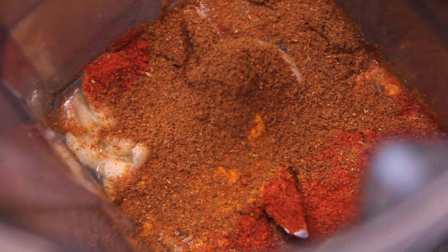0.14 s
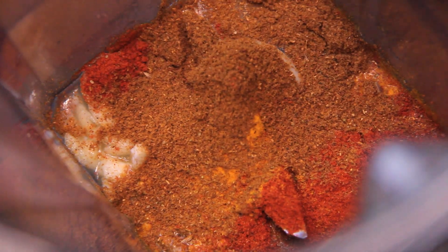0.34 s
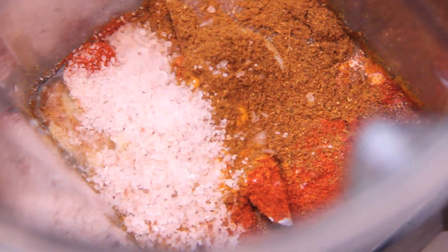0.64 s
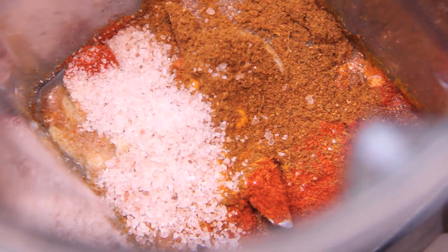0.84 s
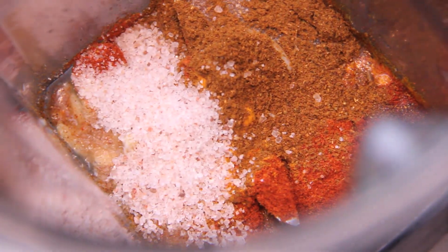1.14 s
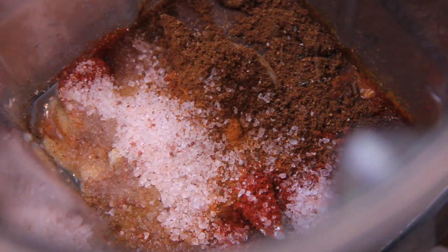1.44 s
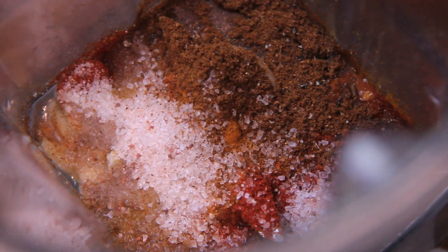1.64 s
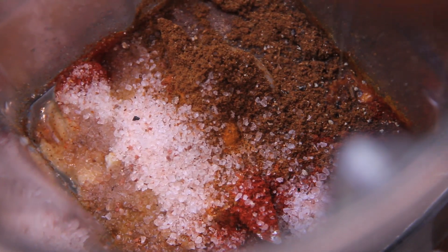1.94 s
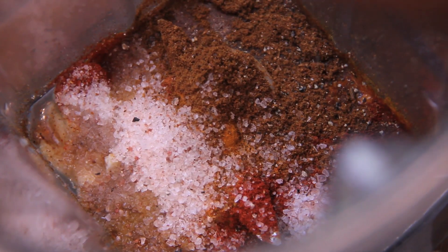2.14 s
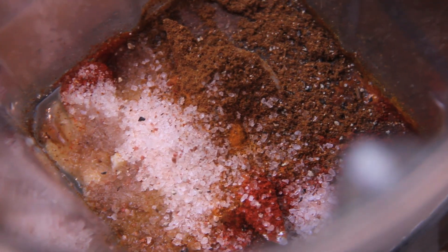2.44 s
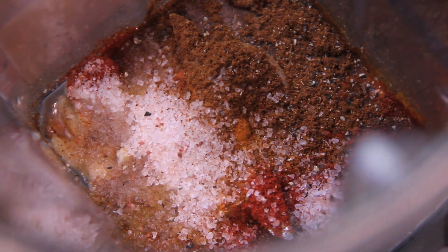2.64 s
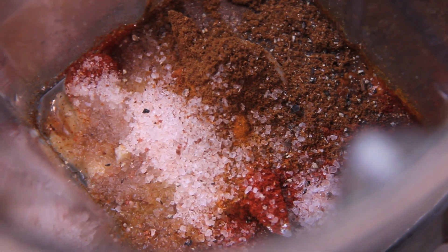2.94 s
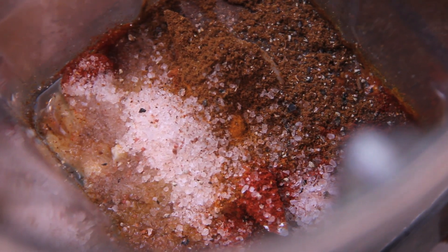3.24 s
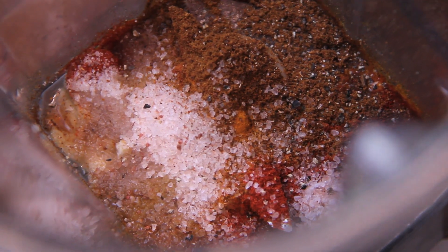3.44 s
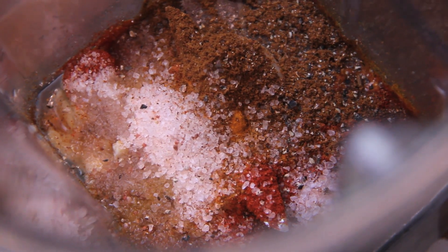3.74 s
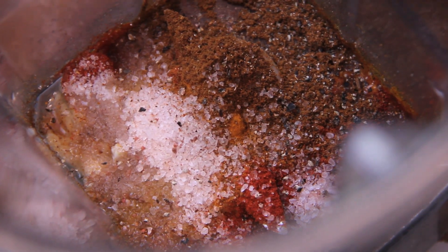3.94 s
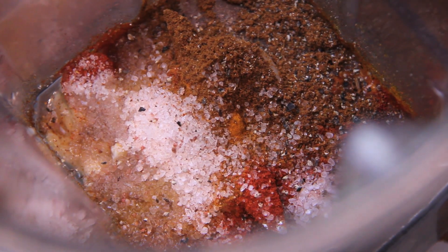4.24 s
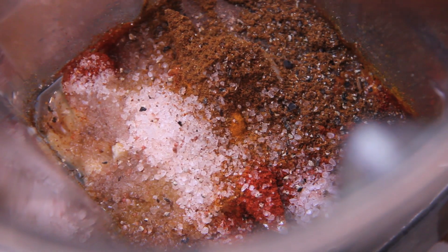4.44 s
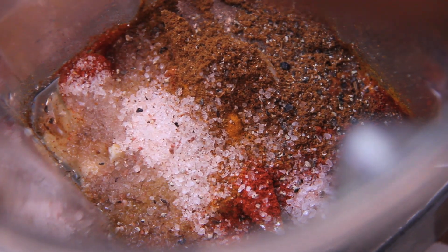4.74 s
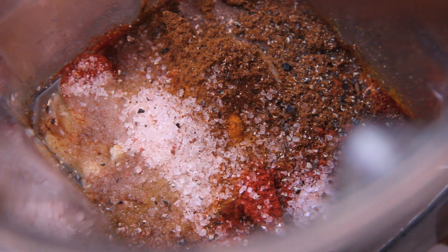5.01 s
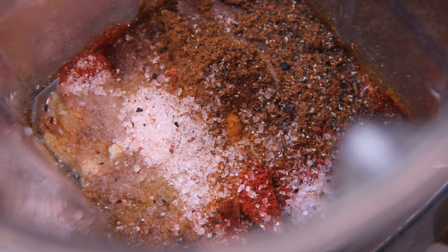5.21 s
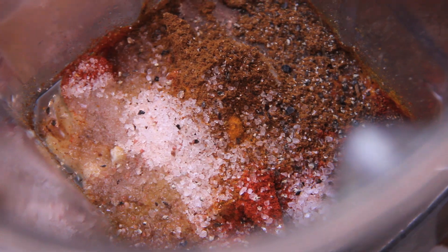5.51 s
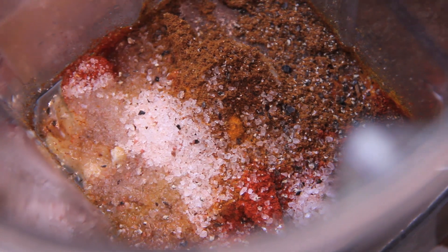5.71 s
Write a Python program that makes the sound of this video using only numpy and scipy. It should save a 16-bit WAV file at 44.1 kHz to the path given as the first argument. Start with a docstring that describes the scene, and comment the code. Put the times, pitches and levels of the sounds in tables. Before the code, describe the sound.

At the very start a spoon knocks lightly on the rim of a plastic blender jar, about three quick hollow clacks that stop short at 0.4 seconds. Around 0.55 seconds salt lands on powder with a faint, brief patter. A short scrape follows near 1 second. From 1.4 seconds until the end, around 6 seconds, a pepper mill twists back and forth at about three and a half strokes a second. Each stroke is a dry crunch ending in fine, bright grit. Peppercorns burst with sharp, irregular cracks, the loudest sounds here, and the shaft gives soft dull bumps on some reversals. A very faint thin squeak comes just after 3 seconds. Near 5.8 seconds a last loud crack carries a short low thump as it overloads the microphone. Everything is close, with slight kitchen reverberation and a very low background hush.

```python
"""Seasoning a blender jar

Close over a plastic jar in a kitchen: a spoon knocks spice off on the rim, salt slides in and
something scrapes briefly. Then a pepper mill twists back and forth, about 3.5 strokes a second:
peppercorns crack between the burrs, the pieces are crushed, each stroke ends in fine bright grit."""
import sys
import numpy as np
from scipy import signal
from scipy.fft import rfft, irfft, next_fast_len
from scipy.io import wavfile
from scipy.ndimage import uniform_filter1d, map_coordinates

SR = 44100
rng = np.random.default_rng(int(sys.argv[2]) if len(sys.argv) > 2 else 0)


def master_out(mix):
    """Clip the mix to full scale and print it as 16-bit PCM to the path in sys.argv[1]."""
    frames = np.transpose(np.atleast_2d(mix))
    ceiling = np.clip(frames, -1, 1)
    pcm = np.round(ceiling * 32767).astype(np.int16)
    wavfile.write(sys.argv[1], SR, pcm)


N = 258867


def amp(db):
    """Decibels to gain."""
    return 10 ** (np.asarray(db) / 20)


def unit(x):
    """x at rms 1."""
    return x / np.sqrt(np.mean(x ** 2) + 1e-20)


def along(points, hz):
    """(Hz, value) points read on a log axis."""
    freqs, values = np.transpose(points)
    return np.interp(np.log(hz + 1), np.log(freqs + 1), values)


def envelope(points):
    """Gain per sample from (s, dB) points; silent outside them."""
    times, db = np.transpose(points)
    return amp(np.interp(np.arange(N) / SR, times, db, left=-120, right=-120))


def add(track, at_s, sound):
    """Mix a sound into the track."""
    start = round(at_s * SR)
    part = sound[max(-start, 0):max(N - start, 0)]
    track[max(start, 0):][:len(part)] += part


def colour(x, spectrum, size=4096):
    """Minimum-phase filter of energy 1, shaped by (Hz, dB) points."""
    gain = amp(along(spectrum, np.fft.rfftfreq(size, 1 / SR)))
    cepstrum = irfft(np.log(gain))
    cepstrum[1:size // 2] *= 2
    cepstrum[size // 2 + 1:] = 0
    response = irfft(np.exp(rfft(cepstrum)))
    return signal.fftconvolve(x, response / np.linalg.norm(response))[:len(x)]


def burst(t60_s, size=8192):
    """Decaying noise puff of energy 1."""
    puff = rng.standard_normal(size) * amp(-60 * np.arange(size) / SR / t60_s)
    return puff / np.linalg.norm(puff)


def grains(per_s, spread_db, t60_s, bed):
    """Tiny puffs of random time and size on a steady noise bed; rms 1."""
    sizes = amp(spread_db * np.clip(rng.standard_normal(N), -2, 2))
    snaps = (rng.random(N) < per_s / SR) * sizes ** 2
    power = signal.lfilter([1], [1, -amp(-120 / (t60_s * SR))], snaps)
    return unit(rng.standard_normal(N) * np.sqrt(power / power.mean() + bed))


# background spectrum (frequency [Hz], level [dB])
HUSH_SPECTRUM = [(15, -28), (25, -17), (70, -1.5), (157, -4.5), (270, 0), (624, -13), (1190, -14),
                 (1290, -18.5), (6740, -25), (16000, -35)]


def room_hush():
    """The kitchen's steady low background."""
    return amp(-61.5) * unit(colour(rng.standard_normal(N), HUSH_SPECTRUM))


# room decay (frequency [Hz], t60 [s])
KITCHEN_DECAY = [(200, 0.39), (1000, 0.42), (4000, 0.34), (9000, 0.2), (15000, 0.3)]


def kitchen(x, wet_db):
    """Room reverberation; a fresh tail every 1/8 s stands for the moving hands."""
    out, block = np.zeros(N), SR // 8
    for start in range(0, N, block):
        hz, t, noise = signal.stft(rng.standard_normal(SR // 2), SR, nperseg=256)
        decay = amp(-60 * t / along(KITCHEN_DECAY, hz)[:, None])
        onset = 1 - np.exp(-t / 0.00035)
        _, tail = signal.istft(noise * decay * onset, SR, nperseg=256)
        add(out, start / SR, signal.fftconvolve(x[start:start + block], tail / np.linalg.norm(tail)))
    return amp(wet_db) * out


# spoon on the rim (time [s], level [dB])
RIM_KNOCKS = [(-.055, -14), (0.108, -21.5), (0.2656, -17.5)]
# jar modes (frequency [Hz], level [dB], t60 [s])
JAR_MODES = [(175, -21.5, 0.12), (388, -14, 0.076), (435.6, -4, 0.15), (533, 1.5, 0.12), (657, -3, 0.037),
             (714, -11, 0.14), (1023, -13.5, 0.08), (1493, -2.5, 0.068), (1767, -3.5, 0.048),
             (2160, -1, 0.028), (2440, -7, 0.051), (2780, -6, 0.03)]
# contact spectrum (frequency [Hz], level [dB])
CLACK_SPECTRUM = [(150, -37.5), (450, -4), (1100, -7.5), (2400, -6.5), (3200, -10), (3900, -25),
                  (4400, -10.5), (5900, -16), (8000, -31), (9500, -26), (11000, -36), (16000, -47)]


def spoon_knocks(cutoff_s=0.405):
    """Each knock clacks and rings the jar; the sound stops short after the last."""
    out, t = np.zeros(N), np.arange(SR // 2) / SR
    for at_s, db in RIM_KNOCKS:
        ring = np.zeros(len(t))
        for hz, mode_db, t60_s in JAR_MODES:
            decay = amp(mode_db + rng.normal(0, 1) - 60 * t / t60_s)
            ring += decay * np.sin(2 * np.pi * hz * t + rng.uniform(0, 2 * np.pi))
        ring *= 1 - np.exp(-t / 0.0031)
        contact = burst(t60_s=0.04, size=len(t)) + 0.087 * burst(t60_s=0.47, size=len(t))
        clack = amp(22) * colour(contact, CLACK_SPECTRUM) * (1 - np.exp(-t / 0.00069))
        add(out, at_s, amp(db) * (ring + clack))
    return (out + kitchen(out, wet_db=-12)) * (np.arange(N) / SR < cutoff_s)


# salt landing (time [s], level [dB])
SALT_FLOW = [(.52, -82), (.545, -54), (.57, -55.5), (.62, -62.5), (.72, -79), (.8, -81)]
# patter spectrum (frequency [Hz], level [dB])
SALT_SPECTRUM = [(300, -28), (900, -6), (1600, -1.5), (3500, -5.5), (7500, -4.5), (11000, -9), (16000, -8)]


def salt():
    """Crystals patter softly on the powder."""
    patter = grains(per_s=2500, spread_db=3.5, t60_s=0.0025, bed=0.2)
    return envelope(SALT_FLOW) * colour(patter, SALT_SPECTRUM)


# scrape contour and its catches (time [s], level [dB])
SCRAPE_CONTOUR = [(.87, -75), (.915, -61), (.937, -54), (.943, -40.5), (.975, -40), (1.01, -49),
                  (1.05, -59), (1.09, -59), (1.14, -80)]
SCRAPE_CATCHES = [(0.921, -21.5), (0.94, -24), (0.95, -27), (0.958, -26), (1.06, -30)]
# scrape resonances; body tone, shared with the cracks (frequency [Hz], level [dB])
SCRAPE_SPECTRUM = [(250, -21), (600, -7.5), (1200, 2.5), (2400, -7.5), (3400, -15), (4100, -14),
                   (5900, -18), (6400, -4.5), (8000, -14.5), (9400, -24), (10300, -9.5), (11500, -26),
                   (16000, -31)]
BODY_SPECTRUM = [(40, -33), (250, -20.5), (450, -11), (700, 1.5), (990, 4.5), (1180, 1), (1400, 7.5),
                 (1600, 1), (2150, 2), (3000, -3.5), (6000, -22.5)]


def scrape():
    """Quick uneven slips excite a few broad resonances; their lower part lingers in the room."""
    slips = envelope(SCRAPE_CONTOUR) * grains(per_s=290, spread_db=2.5, t60_s=0.0034, bed=0.86)
    for at_s, db in SCRAPE_CATCHES:
        catch = burst(t60_s=0.0015) + 0.55 * burst(t60_s=0.065)
        add(slips, at_s + 0.00113, amp(db + 6.5) * catch)
    return amp(1) * colour(slips, SCRAPE_SPECTRUM) + kitchen(colour(slips, BODY_SPECTRUM), wet_db=-10)


# mill strokes (bite time [s], lead-in [s], length [s], bite grit [dB], squeeze grit [dB], crush [dB])
MILL_STROKES = [(1.403, .02, 0.16, -30, -28, -37), (1.754, 0.11, 0.1, -31.5, -28, -32.5),
                (1.99, 0.025, 0.17, -31, -27.5, -35), (2.312, 0.068, 0.17, -32.5, -28.5, -37),
                (2.623, .06, 0.15, -33, -26.5, -37), (2.881, .02, .17, -30, -29, -37),
                (3.173, .06, 0.16, -31.5, -28.5, -34.5), (3.442, 0.044, 0.18, -30.5, -28, -39.5),
                (3.752, 0.12, .14, -31, -31.5, -40), (4.008, 0.0099, 0.18, -25, -31, -46),
                (4.324, 0.083, 0.15, -31, -31.5, -37.5), (4.57, 0.019, 0.21, -29, -28.5, -35.5),
                (4.896, 0.062, .15, -29.5, -30.5, -40), (5.161, 0.056, 0.15, -27.5, -25.5, -38.5),
                (5.449, 0.13, 0.14, -28, -27, -36), (5.737, 0.18, 0.22, -31.5, -34, -49)]


def stroke_gains(onset_s=1.407):
    """Coarse and fine gains: a stroke bites, eases as the corns give way, squeezes and lets go."""
    squeeze_s, release_s, fade_s = 0.021, 0.037, 0.044
    slack_db, rest_db = -47, -66
    coarse, fine = np.zeros((2, N))
    for bite_s, lead_s, length_s, bite_db, squeeze_db, crush_db in MILL_STROKES:
        start_s, end_s = bite_s - lead_s, bite_s + length_s
        eased_db = (bite_db + squeeze_db) / 2 - 5
        grit = envelope([
            (start_s - fade_s, rest_db), (start_s, slack_db), (bite_s, bite_db),
            (bite_s + 0.51 * length_s, eased_db), (end_s - squeeze_s, squeeze_db), (end_s, squeeze_db),
            (end_s + release_s, slack_db), (end_s + release_s + fade_s, rest_db)])
        pieces = envelope([
            (start_s, rest_db), (bite_s, bite_db - 14), (bite_s + 0.36 * length_s, crush_db),
            (end_s, crush_db - 17.5), (end_s + release_s, rest_db)])
        coarse, fine = np.maximum(coarse, pieces), np.maximum(fine, grit)
    loose_crumbs = amp([[-54], [-49.5]])
    return np.hypot([coarse, fine], loose_crumbs) * (np.arange(N) / SR > onset_s)


def chips(per_stroke=3, body_db=-24, bright_db=-14):
    """Small pieces snap at random in every stroke; rows for cracks()."""
    rows = []
    for bite_s, lead_s, length_s, *_ in MILL_STROKES:
        for place, strength in rng.random((per_stroke, 2)):
            at_s = bite_s - lead_s / 2 + place * (length_s + lead_s / 2)
            rows.append((at_s, -26 + 6 * strength, body_db, bright_db))
    return rows


def clumps(depth_db=1, knots_per_s=41):
    """Uneven gain: grains cluster as single corns collapse."""
    wander = map_coordinates(rng.standard_normal(4096), [np.arange(N) * knots_per_s / SR])
    return unit(amp(depth_db * wander))


# spectra of coarse pieces, grit and dust (frequency [Hz], level [dB])
CRUSH_SPECTRUM = [(150, -61), (400, -19), (680, -2), (980, -1), (1200, 0), (1500, 0.5), (2200, 5.5),
                  (3000, 2.5), (4500, -1), (5500, 0), (8000, -1.5), (16000, -49.5)]
GRIT_SPECTRUM = [(300, -47), (1500, -20), (2300, -11.5), (2900, -5.5), (3700, -5.5), (4600, -6),
                 (5500, -3.5), (7000, -2.5), (9200, -1), (10500, -7), (13000, -17.5), (16000, -29)]
DUST_SPECTRUM = [(3000, -29), (6500, 7), (9000, -12.5), (10500, -2.5), (12000, -4.5), (14000, -12.5),
                 (16000, -14.5)]


def grinding():
    """The burrs crush coarse pieces in mid-stroke and mill them to grit; some fractures sound in both."""
    coarse, fine = stroke_gains() * clumps()
    shared = grains(per_s=180, spread_db=2, t60_s=0.051, bed=0.022)
    crush = unit(grains(per_s=600, spread_db=2, t60_s=0.012, bed=0.093) + 0.57 * shared)
    grit = unit(grains(per_s=900, spread_db=3.5, t60_s=0.0015, bed=0.4) + 0.87 * shared)
    pressure = fine / (fine + amp(-34))  # only a firm twist makes the brightest dust
    dust = amp(-13.5) * pressure * colour(grit, DUST_SPECTRUM)
    crushing = amp(1.5) * coarse * colour(crush, CRUSH_SPECTRUM)
    return crushing + fine * (amp(-0.5) * colour(grit, GRIT_SPECTRUM) + dust)


# barrel modes (frequency [Hz], bandwidth [Hz], level [dB])
BARREL_MODES = [(987, 26, -3), (1407, 29, -13), (2130, 14, -4.5), (2720, 370, -18), (3610, 43, -4.5),
                (4450, 370, -6.5), (6110, 98, -9.5), (6690, 62, -10)]


def barrel(x, size=4096):
    """The mill's barrel rings on briefly after each fracture."""
    t, response = np.arange(size) / SR, np.zeros(size)
    for hz, width_hz, db in BARREL_MODES:
        decay = 2 * np.pi * width_hz / SR * np.exp(-np.pi * width_hz * t)
        response += amp(db) * decay * np.cos(2 * np.pi * hz * t)
    response[0] += 1  # direct path
    return signal.fftconvolve(x, response / np.linalg.norm(response))[:N]


# shaft bumps (time [s], level [dB])
SHAFT_BUMPS = [(1.406, -42), (1.677, -37), (2.854, -33), (3.411, -38), (3.987, -34.5), (4.28, -39),
               (4.557, -36.5), (4.847, -30.5), (5.11, -38.5)]


def shaft_bumps():
    """Play in the shaft gives a dull bump when the twist reverses."""
    spectrum = [(40, -36), (90, -10), (170, -6.5), (300, -11), (600, -17.5), (1500, -17), (5000, -45)]
    out = np.zeros(N)
    for at_s, db in SHAFT_BUMPS:
        add(out, at_s + 0.0034, amp(db + 14) * burst(t60_s=0.1))
    return colour(out, spectrum)


# bursting peppercorns (time [s], level [dB], relative body [dB], relative brightness [dB])
CORN_CRACKS = [(1.48, -4.5, -22.5, -14.5), (1.4854, -11, -11, -11.5), (1.5276, -12, -17.5, -12),
               (1.5327, -13, -19, -16), (1.7818, -16, -14, -9), (2.145, -28, -39, -5),
               (2.394, -19.5, -21.5, -5.5), (2.555, -24.5, -22, -4), (2.6247, -4.5, -12, -13),
               (2.7801, -16, -43, -5.5), (2.9049, -19.5, -6, -8), (2.9288, -15, -15.5, -8),
               (3.032, -17.5, -42, -8), (3.2295, -9, -16, -9), (3.2432, -3.5, -20, -13.5),
               (3.3382, -22, -23, -3), (3.486, -1.5, -20.5, -13), (3.4907, -9, -14.5, -12.5),
               (3.535, -13, -18, -10), (3.55, -4.5, -27, -15), (3.5528, -0.5, -27, -22),
               (3.6067, -23.5, -41, 4.5), (3.7712, -14.5, -18.5, -15), (3.7815, 0.5, -25.5, -18.5),
               (4.0661, -1, -22, -13), (4.0791, -15, -10.5, -10), (4.334, -8.5, -17, -8),
               (4.37, -6.5, -13, -8), (4.4039, -9.5, -24, -14), (4.5584, -32, -20, -16),
               (4.6561, -7.5, -22, -14.5), (4.9156, -5, -23.5, -22), (5.1695, -12.5, -15, -12),
               (5.4531, -12.5, -13.5, -8), (5.472, -14, -15.5, -13), (5.548, -20, -32, -9),
               (5.7737, -2, -13.5, -8), (5.7983, -16, -21, -8)]
# spectra of shell and splinters (frequency [Hz], level [dB])
SHELL_SPECTRUM = [(100, -41.5), (500, -26.5), (1500, -11.5), (2800, -5), (3100, -7), (3700, -4),
                  (4600, 1.5), (5200, -3.5), (6200, -3), (7300, -7), (9000, -11.5), (12000, -38),
                  (16000, -16.5)]
SPLINTER_SPECTRUM = [(3000, -52), (6000, -5), (7500, 3.5), (9000, 2), (10400, 2), (11500, -4.5),
                     (16000, -11.5)]


def cracks():
    """A corn splits, its halves break 1-3 ms later, and the crumbs rattle briefly."""
    shell, body, splinters = np.zeros((3, N))
    for at_s, db, body_db, bright_db in CORN_CRACKS + chips():
        snap = burst(t60_s=0.0076) + 0.5 * burst(t60_s=0.083)
        for delay_s in rng.uniform(0.001, 0.003, size=2):
            half = np.pad(burst(t60_s=0.018), (round(delay_s * SR), 0))
            snap += 0.46 * half[:len(snap)]
        # the mill's body takes the split as one clean kick
        kick = 0.55 * signal.unit_impulse(len(snap), 20) + 0.77 * snap
        add(shell, at_s + 0.000993, amp(db + 9.5) * snap)
        add(body, at_s + 0.000955, amp(db + body_db + 22.5) * kick)
        add(splinters, at_s + 0.0011, amp(db + bright_db + 16.5) * snap)
    return (colour(shell, SHELL_SPECTRUM) + colour(body, BODY_SPECTRUM)
            + colour(splinters, SPLINTER_SPECTRUM))


# squeak contour (time [s], level [dB])
SQUEAK_CONTOUR = [(3.06, -78), (3.08, -62), (3.16, -53.5), (3.2, -72)]


def shaft_squeak(pitch_hz=931):
    """The shaft squeaks faintly between two strokes: a thin, unsteady tone."""
    drift = unit(uniform_filter1d(rng.standard_normal(N), SR // 100))
    phase = 2 * np.pi * np.cumsum(pitch_hz * (1 + 0.0065 * drift)) / SR
    return envelope(SQUEAK_CONTOUR) * unit(np.sin(phase))


def overload_thump(at_s=5.7745, push_db=-20.5, rise_s=0.00023):
    """The last loud crack overloads the microphone: a low push and a short dull thump."""
    spectrum = [(40, -12), (170, -3.5), (300, -14), (480, -1), (800, -14), (3000, -37)]
    out, age = np.zeros(N), np.arange(SR // 20) / SR / rise_s
    add(out, at_s, amp(push_db) * age * np.exp(1 - age))
    add(out, at_s + 0.002, amp(push_db + 13) * colour(burst(t60_s=0.026), spectrum))
    return out


def scene():
    """All sources at one close microphone."""
    mill = barrel(grinding() + cracks()) + shaft_bumps() + overload_thump() + shaft_squeak()
    return (spoon_knocks() + salt() + scrape() + mill + kitchen(mill, wet_db=-12) + room_hush())[None]


def record(dry, top_hz=16000):
    """Clip at full scale, then limit the band."""
    size = next_fast_len(N + SR // 2)
    spectrum = rfft(np.clip(dry, -1, 1), size)
    return irfft(spectrum * (np.fft.rfftfreq(size, 1 / SR) < top_hz), size)[:, :N]


dry = scene()
out = record(dry)
master_out(out)
```